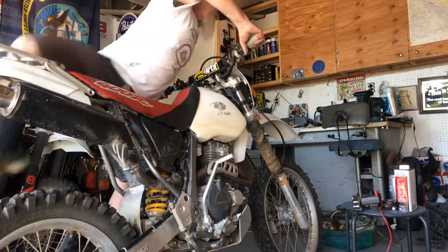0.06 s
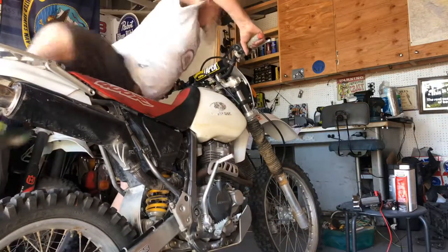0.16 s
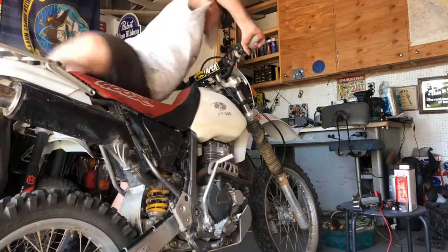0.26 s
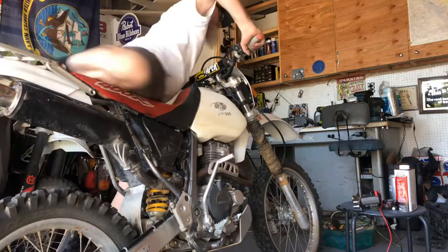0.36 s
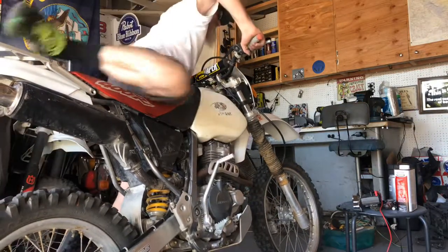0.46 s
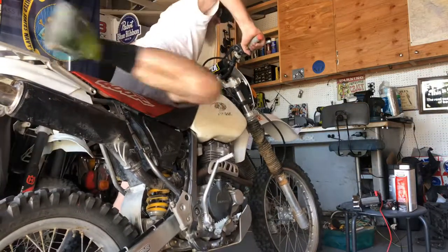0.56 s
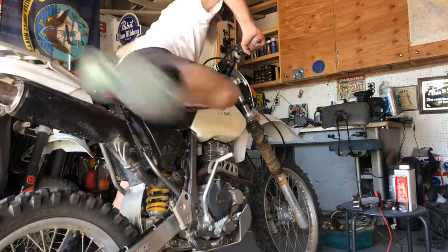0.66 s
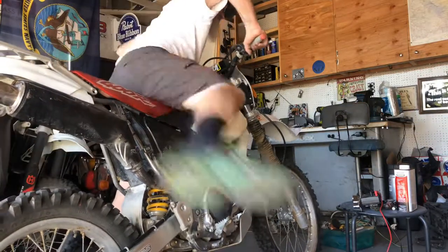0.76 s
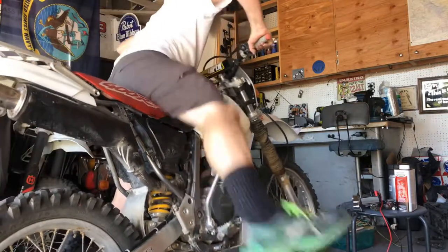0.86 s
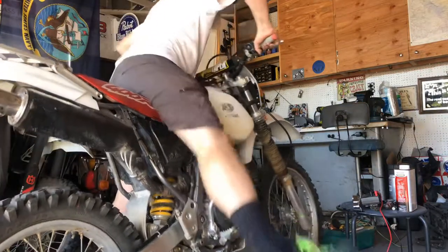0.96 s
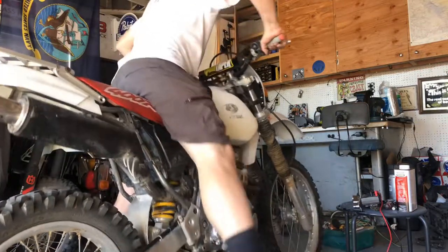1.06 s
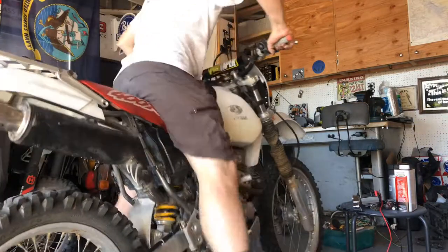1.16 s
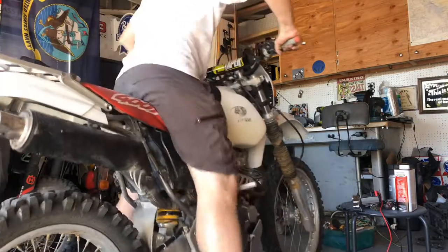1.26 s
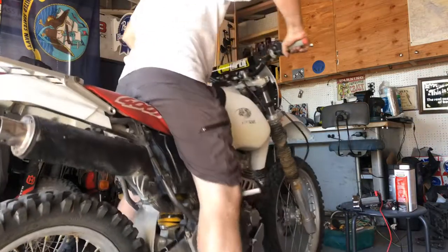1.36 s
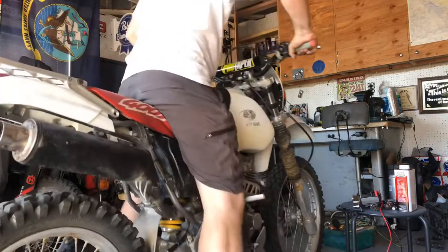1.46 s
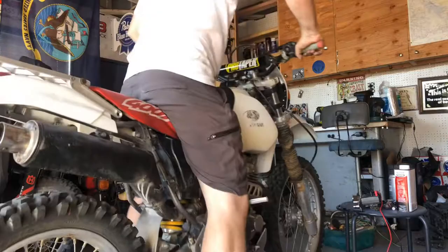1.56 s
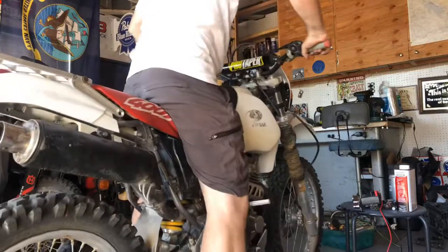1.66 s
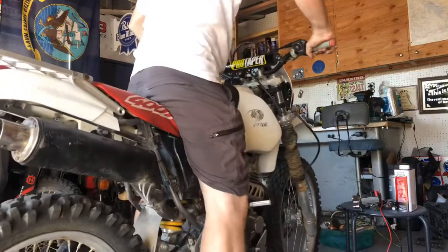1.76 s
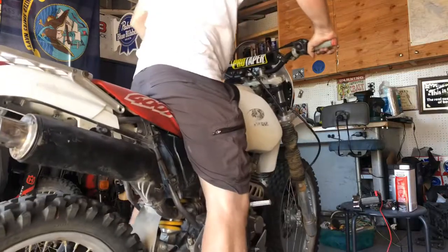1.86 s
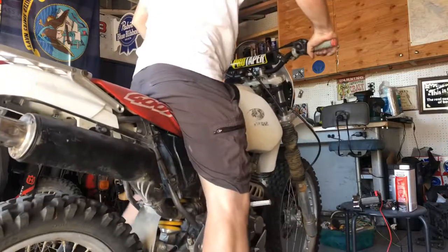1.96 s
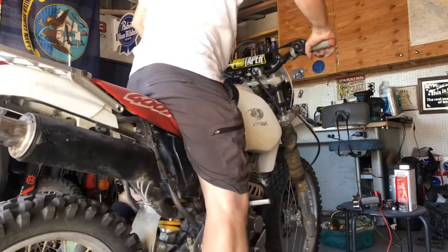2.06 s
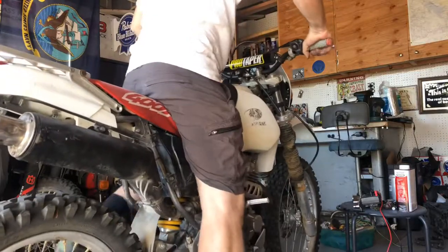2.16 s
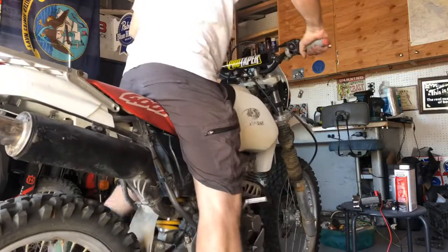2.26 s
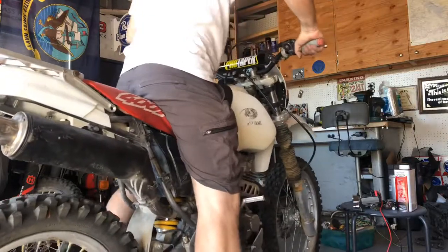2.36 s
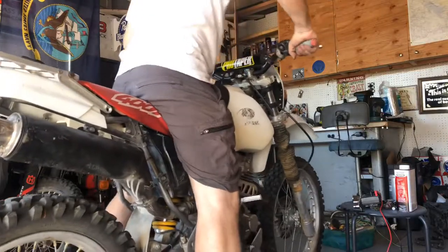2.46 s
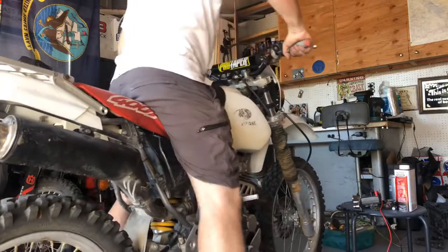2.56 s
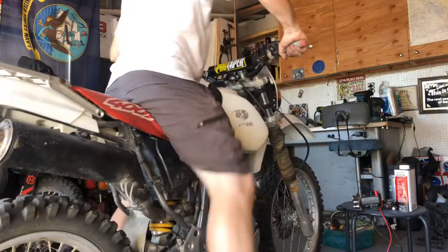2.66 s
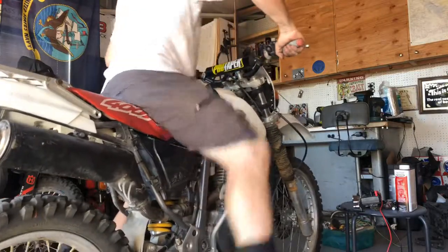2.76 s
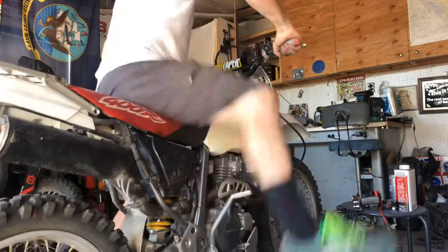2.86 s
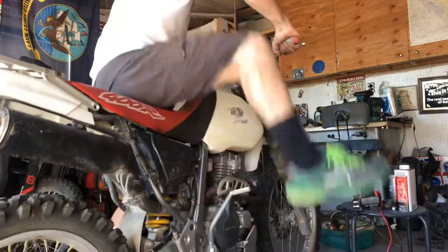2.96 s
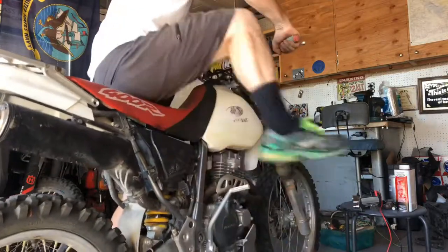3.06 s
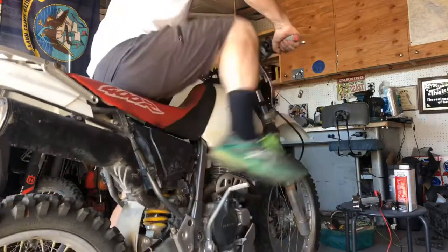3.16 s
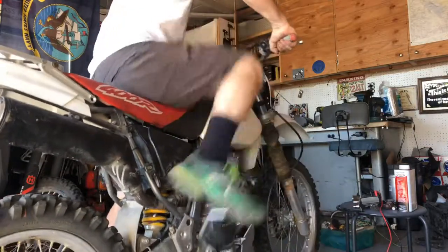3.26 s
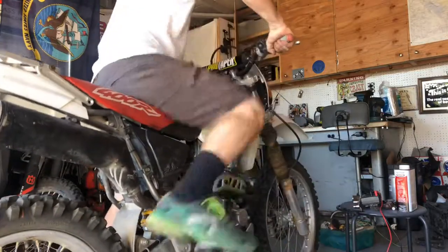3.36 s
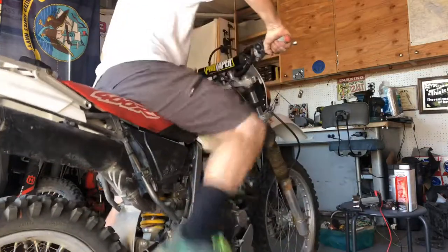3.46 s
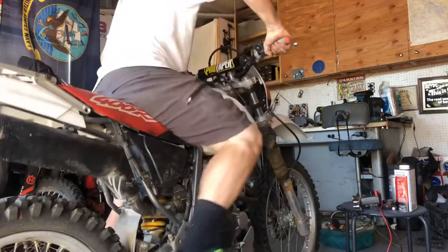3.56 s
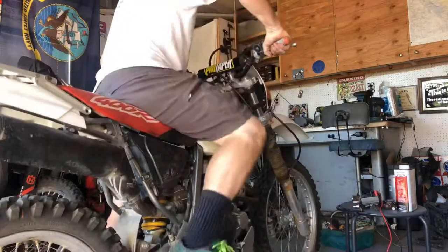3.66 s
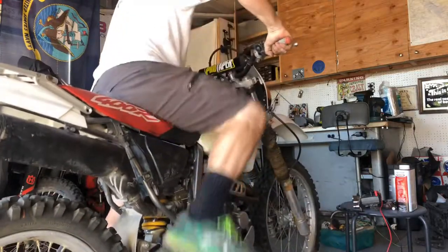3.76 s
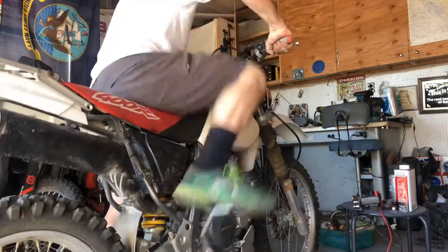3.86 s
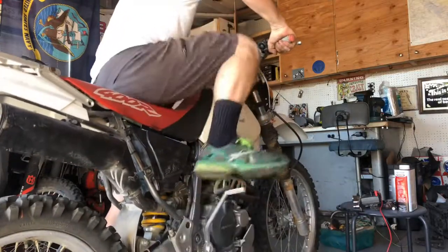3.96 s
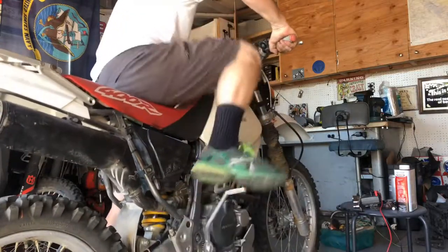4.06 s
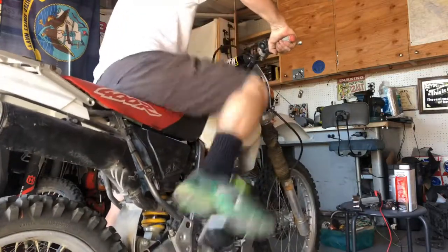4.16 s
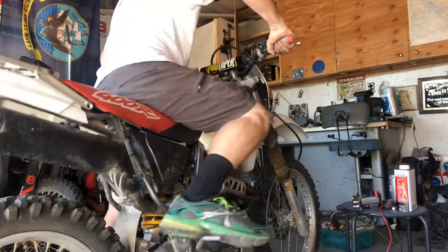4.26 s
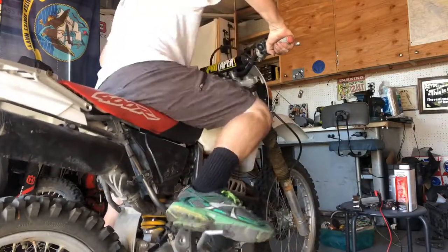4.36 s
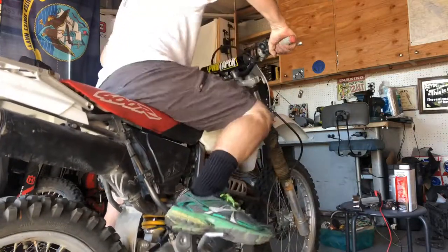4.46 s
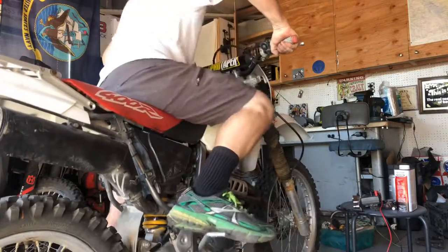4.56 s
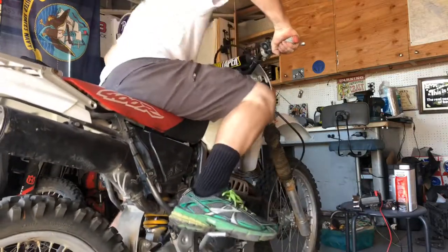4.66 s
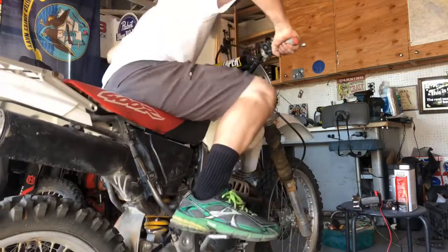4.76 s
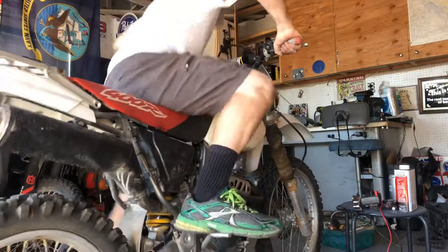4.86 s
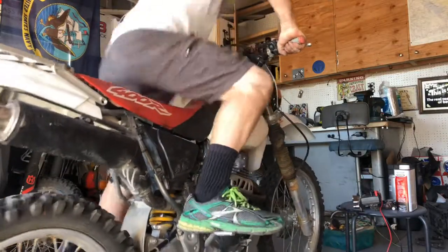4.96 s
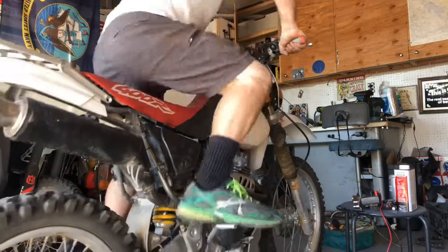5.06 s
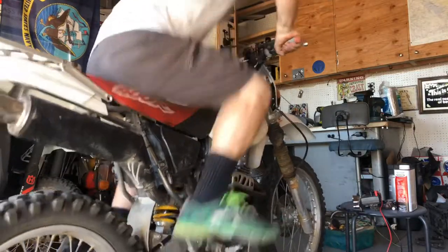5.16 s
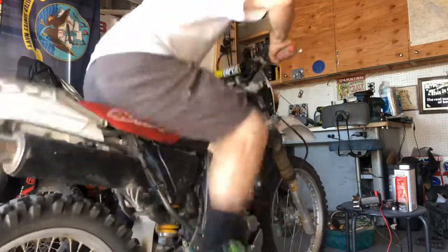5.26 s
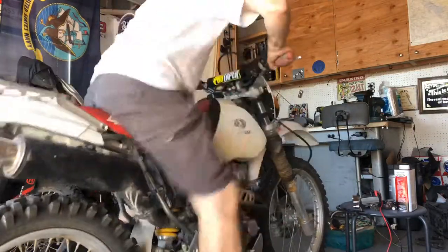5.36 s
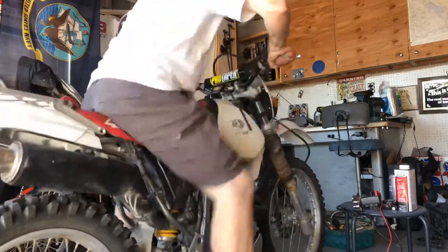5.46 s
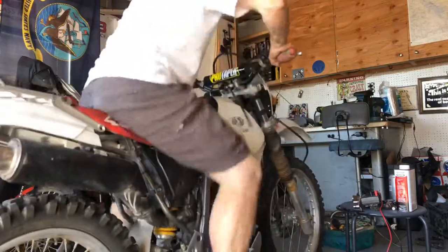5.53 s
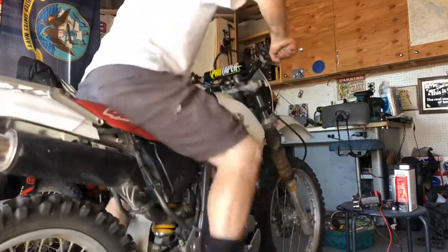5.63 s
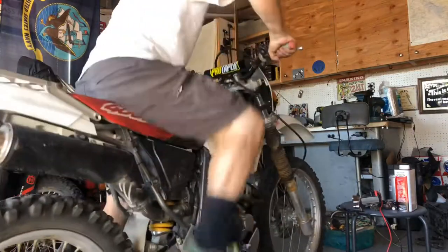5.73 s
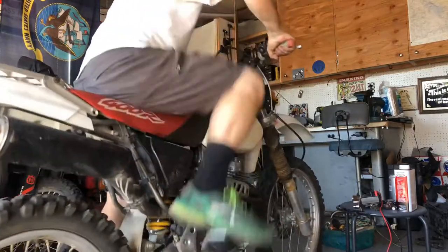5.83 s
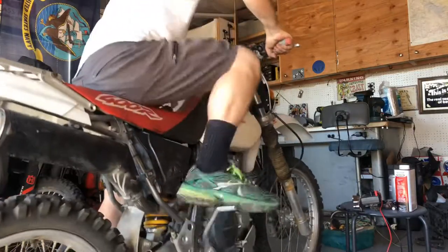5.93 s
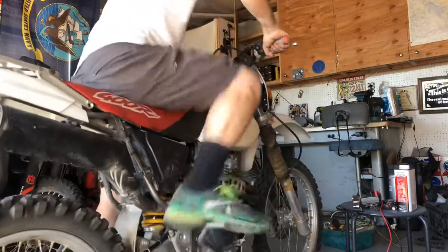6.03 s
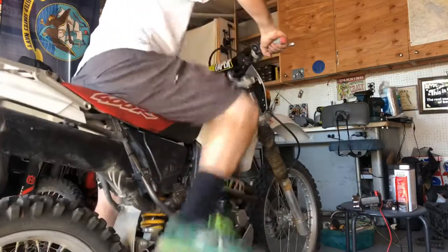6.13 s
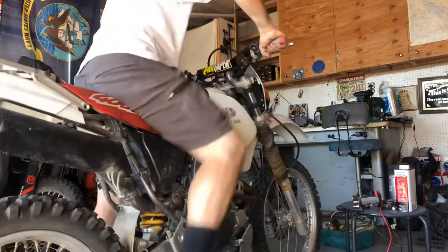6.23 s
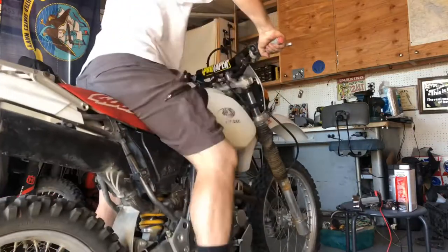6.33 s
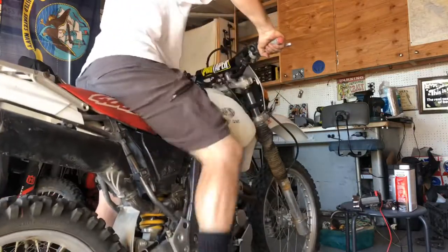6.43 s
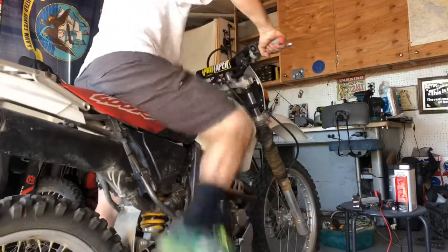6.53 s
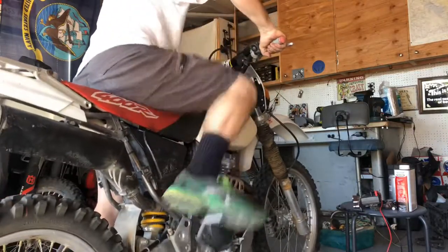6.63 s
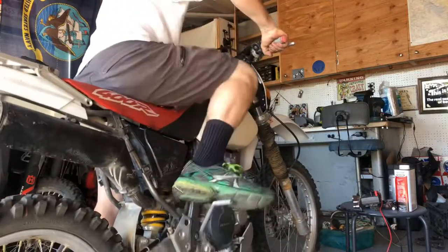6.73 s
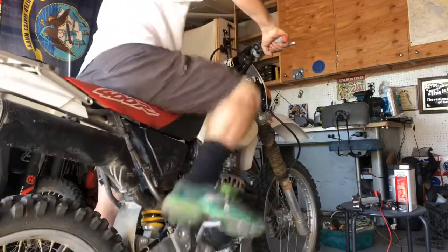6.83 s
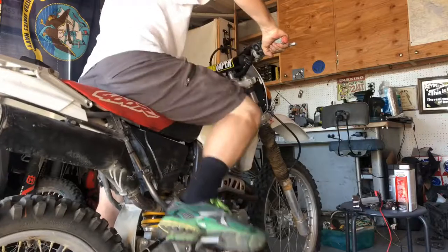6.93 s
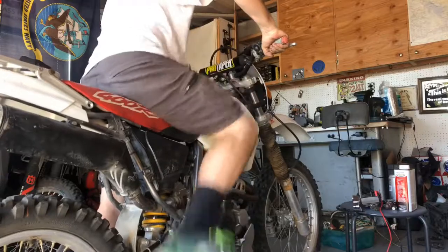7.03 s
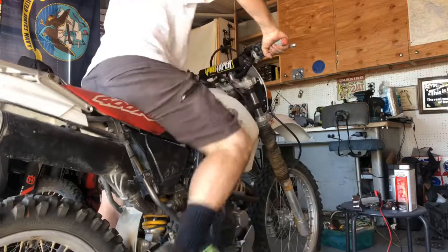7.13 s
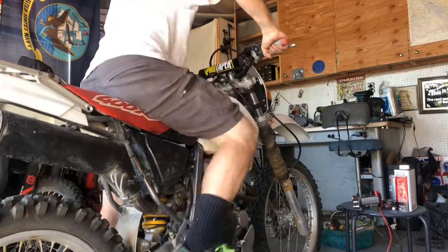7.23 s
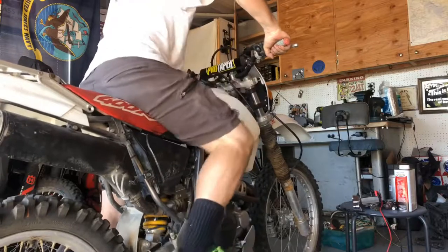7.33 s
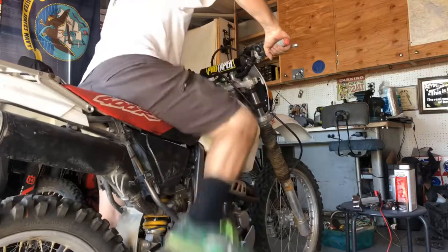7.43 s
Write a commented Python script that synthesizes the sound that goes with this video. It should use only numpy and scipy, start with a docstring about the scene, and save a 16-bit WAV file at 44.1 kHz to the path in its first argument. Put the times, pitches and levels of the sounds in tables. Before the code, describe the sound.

One microphone sits close to a dirt bike in a quiet garage, with a short echo from hard walls. Faint scuffs come at about 0.6 seconds, then light steel clicks from 1 to 1.3. At 2.1 the kick lever swings out with a loud clank, its spring ringing faintly afterwards. From 3.3 to 4.3 it is eased round with small knocks, clicks, a soft churn of gears and shoe scuffs. At 5.2 comes the one hard kick, the loudest moment: gears churn, the cylinder gives a quick cluster of deep thumps through the silencer, and the lever strikes its stop near 5.5. It ratchets back from 5.7 to 5.9. A gentler push at 6.1 turns the gears with a low puff from the pipe, followed by more ratcheting at 6.5, a knock at 6.9 and a last short push with scuffs. The engine never catches.

```python
"""Dirt bike kicked over in a garage

One microphone close to a single-cylinder dirt bike in a quiet home garage; the engine does not catch.
The kick lever swings out with a clank, is eased round to compression and stamped down once: the
cylinder thumps through the silencer, the lever hits its stop and ratchets back. Gears churn and a
shoe scuffs in between, and the hard walls answer."""
import sys
import numpy as np
from scipy import signal
from scipy.fft import rfft, irfft, next_fast_len
from scipy.io import wavfile
from scipy.ndimage import map_coordinates

SR = 44100
rng = np.random.default_rng(int(sys.argv[2]) if len(sys.argv) > 2 else 0)


def transcribe(signal):
    """Save signal, clipped to [-1, 1], as a 16-bit WAV file at the path in sys.argv[1]."""
    frames = np.atleast_2d(signal).T
    limited = np.clip(frames, -1, 1)
    pcm = np.round(limited * 32767).astype(np.int16)
    wavfile.write(sys.argv[1], SR, pcm)


N = 330309
RING_TIME = np.arange(SR * 3 // 4) / SR  # seconds since a blow

# Levels in the tables are relative; a t60 is the time to fall by 60 dB.
# The garage's reverberation. Each row: frequency in Hz, t60 in seconds.
GARAGE_DECAY = [(80, 0.24), (500, 0.44), (1200, 0.4), (4000, 0.33), (8000, 0.26), (15000, 0.18)]
# Tone colours at the microphone. Each row: frequency in Hz, level in dB.
ROOM_TONE = [(15, -26), (25, -6), (72, -1.5), (354, -6.5), (427, -4), (1370, -17.5), (2760, -17.5),
             (7920, -25.5), (16000, -39)]
AIR_TONE = [(20, -12.5), (45, -4.5), (60, -8), (69, 6), (82, -10), (120, -7), (170, -26), (400, -47.5)]
GEAR_TONE = [(65, -35), (110, 6), (184, -4.5), (315, 0.5), (532, -3), (646, 0), (1260, -12), (2010, -24.5),
             (3000, -41), (3900, -37), (6600, -120)]
RUB_TONE = [(710, -28), (1200, -3), (2480, 5), (3180, -1.5), (4220, -3), (4960, -7.5), (12500, -28),
            (16000, -27)]
STEEL_TONE = [(30, 7), (90, -13), (250, 3), (1000, -2), (2400, -4.5), (3500, -4.5), (5800, 2.5), (7500, 4),
              (11000, 5), (15500, -2)]
CASE_TONE = [(30, -47), (65, -5), (110, 4.5), (215, 4.5), (310, 2.5), (500, -1.5), (730, 0.5), (1100, -6),
             (1500, -4.5), (2600, -2.5), (5800, -0.5), (10000, -7.5), (15500, -18)]
# Bass, middle, treble and top of a contact. Each row: lower edge in Hz, upper edge in Hz.
CONTACT_BANDS = [(100, 500), (500, 2500), (2500, 7000), (7000, 16000)]
# The bike's ringing parts. Each row: frequency in Hz, level in dB, t60 in seconds.
SPRING_MODES = [(670, -33, 1.1), (659, -3.5, 3.1), (936, -3.5, 1.2), (1084, -5.5, 1.8), (1227, -11, 1.1),
                (1680, -12, 1.3), (3310, -26.5, 3.5)]
STEEL_MODES = [(1440, -9, 0.84), (1746, 7.5, 0.055), (1980, -8.5, 0.18), (2750, -20, 1), (3450, 0.5, 0.18),
               (3970, -8, 0.56), (4520, 5, 0.068), (4770, -10.5, 0.062), (5870, 0, 0.27), (6400, 2.5, 0.18),
               (6900, -15, 0.17), (8960, -9, 0.11)]
CASE_MODES = [(276, -1, 0.24), (373, 1.5, 0.22), (418.2, -1.5, 0.41), (492.4, -8, 0.64),
              (630.4, -3.5, 0.55), (722, 2, 0.12), (767, -22, 0.2), (919.5, 3, 0.46), (1073, 0, 0.36),
              (1130, -13, 0.51), (1200, -1, 0.16), (1500, 1, 0.23), (1650, -6, 0.25), (1685, -1, 0.35)]
SILENCER_MODES = [(66, -6.5, 0.22), (93.5, 5.5, 0.066), (125.2, 3.5, 0.21), (270, 5.5, 0.14)]
# The low murmur between strokes. Each row: time in seconds, level in dB.
MURMUR_LEVELS = [(0.0, -69), (1.92, -62), (2.17, -57), (2.75, -57.5), (4.97, -57.5), (5.1, -56.5)]
# Pushes that turn the crank. Each row: start and length in seconds, then gears, air and rubbing in dB.
CRANK_STROKES = [(3.313, .24, -49.5, -49.5, -55.5), (4.162, 0.16, -57, -62, -56.5),
                 (5.249, 0.2, -40, -46, -51), (6.099, 0.34, -45.5, -51.5, -54),
                 (7.072, 0.12, -47, -49, -54.5)]
# Shoe and clothes on lever, peg and seat. Each row: time in seconds, level in dB, brightness in dB.
SHOE_SCUFFS = [(0.577, -52, -23), (0.6632, -50.5, -35), (1.6673, -53, -25), (1.919, -48, -19),
               (4.1946, -39, -23.5), (4.2337, -36, -26), (4.9456, -42, -11.5), (5.158, -48, -19.5),
               (5.2184, -34.5, -14.5), (5.4024, -36.5, -4), (6.2773, -43.5, -14), (6.348, -34, -15),
               (6.8703, -39.5, -27), (7.101, -45, -30), (7.206, -51.5, -5), (7.2829, -43.5, -19),
               (7.446, -40, -12)]
# Blows that set the spring singing. Each row: start in seconds, level in dB.
SPRING_TWANGS = [(1.996, -46), (2.145, -53.5)]
# Single contacts of pivot, pawl and stop.
# Each row: time in seconds, level in dB, brightness in dB, ping in Hz.
LEVER_CLICKS = [(1.012, -35, -18.5, 4710), (1.0544, -34.5, -13.5, 4850), (1.3289, -36.5, -28, 4650),
                (1.9936, -41, -11, 2780), (2.0976, -32.5, -13.5, 6970), (3.419, -34, -7, 5850),
                (3.475, -43, -7, 5700), (5.2939, -22, -25, 3900), (5.4544, -17, -13.5, 5800)]
# The lever springing back. Each row: start in seconds, tooth count (to be rounded), first gap and its
# growth per tooth in seconds, tooth level, last tooth level and brightness in dB, ping in Hz.
LEVER_RETURNS = [(3.8734, 2, 0.046, 0, -27.5, -25, -13.5, 4960),
                 (5.691, 5.53, 0.05, 0.00071, -30.5, -24.5, -10.5, 3147),
                 (6.5448, 4.6, .037, .004, -28, -27.5, -14, 4170)]
# Lever and shoe on the engine case. Each row: time in seconds, level, bass weight and treble hardness
# in dB, ping in Hz, gap to the second contact in seconds, its level in dB.
CASE_KNOCKS = [(1.836, -36, -5.5, -6, 928, .02, -48), (2.144, -12.5, -13.5, -11.5, 918, 0.018, -13.5),
               (3.278, -33, -14, -1, 1743, 0.025, -24), (3.351, -27, -9, -8.5, 909, 0.053, -44),
               (3.725, -37.5, -18, -3, 1040, .012, -40), (3.982, -32, -8, -3, 703, 0.03, -47),
               (4.169, -38, -7, -14, 465, 0.025, -35), (4.265, -30.5, -11, -7, 918, 0.022, -34.5),
               (5.225, -29, -7.5, -29, 612, .019, -24.5), (5.481, -19, -11.5, -6.5, 659, .05, -32),
               (6.083, -33.5, -10.5, -3.5, 657, 0.026, -43), (6.907, -31, -11, -7.5, 665, 0.022, -35.5)]
# The kicked cylinder's gas pulses. Each row: time in seconds, level in dB, width in seconds.
GAS_PULSES = [(5.384, -8, 0.0018), (5.488, -21, 0.00123), (5.546, -9, 0.00288), (5.598, -27, 0.0025)]


def amp(db):
    """Decibels to gain."""
    return 10 ** (np.asarray(db) / 20)


def unit(x):
    """Scale to rms 1."""
    return x / np.sqrt(np.mean(x ** 2) + 1e-20)


def along(points, hz):
    """Read (Hz, value) points on a log axis."""
    knots, values = np.transpose(points)
    return np.interp(np.log(hz + 1), np.log(knots + 1), values)


def wobble(rate):
    """A smooth random curve, rate knots a second."""
    return map_coordinates(rng.standard_normal(int(N * rate / SR) + 4), [np.arange(N) * rate / SR])


def add(track, start, sound):
    """Mix a sound into the track from start, in seconds."""
    part = track[round(start * SR):][:len(sound)]
    part += sound[:len(part)]


def coloured(x, *curves):
    """Minimum-phase filter whose gain is the sum of (Hz, dB) curves."""
    size = 2 * next_fast_len(len(x) // 2 + 2048)
    hz = np.fft.rfftfreq(size, 1 / SR)
    gain = amp(sum(along(curve, hz) for curve in curves))
    cepstrum = irfft(np.log(gain + 1e-6), size)
    cepstrum[1:size // 2] *= 2
    cepstrum[size // 2 + 1:] = 0
    return irfft(rfft(x, size) * np.exp(rfft(cepstrum)), size)[:len(x)]


def shaped(x, tone):
    """x coloured by a tone, at rms 1."""
    return unit(coloured(x, tone))


def ring(modes, scatter_db):
    """Damped modes, their strengths scattered at random."""
    hz, db, t60 = np.transpose(modes)[:, :, None]
    level = db + scatter_db * rng.standard_normal(hz.shape)
    return np.sum(amp(level - 60 * RING_TIME / t60) * np.sin(2 * np.pi * hz * RING_TIME), axis=0)


def room_tone():
    """The garage's faint, steady background."""
    return amp(-65) * shaped(rng.standard_normal(N), ROOM_TONE)


def garage(build_s):
    """The walls' answer to a click: it builds up, and the treble dies first."""
    hz, t, spectra = signal.stft(rng.standard_normal(len(RING_TIME)), SR, nperseg=256)
    decay = amp(-60 * t / along(GARAGE_DECAY, hz)[:, None])
    _, tail = signal.istft(spectra * decay, SR, nperseg=256)
    return tail[:len(RING_TIME)] * (1 - np.exp(-RING_TIME / build_s))


def stroke_gain(part, murmur_db, fall_db_per_s, lag_s=0, take_up_s=0.013, swell_db=4.5):
    """A part's gain over the murmur: at each push slack is taken up, the crank speeds up, then slows."""
    t = np.arange(N) / SR
    gain = amp(np.interp(t, *np.transpose(MURMUR_LEVELS)) + murmur_db)
    for start, length, *levels in CRANK_STROKES:
        db = levels[("gears", "air", "rubbing").index(part)]
        age = np.maximum(t - start - lag_s, 0)
        take_up = 1 - np.exp(-age / take_up_s)
        swell = swell_db * np.minimum(age / length - 1, 0)
        fall = fall_db_per_s * np.maximum(age - length, 0)
        gain = np.hypot(gain, take_up * amp(db + swell - fall))
    return gain


def pipe_air():
    """Air sighs through the pipe just after the crank begins to move."""
    gain = stroke_gain("air", murmur_db=-8.5, fall_db_per_s=92, lag_s=0.062)
    return gain * shaped(rng.standard_normal(N), AIR_TONE)


def gears():
    """Meshing teeth churn and ring the case, then coast to rest."""
    gain = stroke_gain("gears", murmur_db=-0.5, fall_db_per_s=98)
    mesh = unit(rng.standard_normal(N) * amp(2 * wobble(70)))
    case_ring = unit(signal.fftconvolve(mesh, ring(CASE_MODES, scatter_db=2.5))[:N])
    return gain * shaped(mesh + amp(-19) * case_ring, GEAR_TONE)


def shoe_rub():
    """The sole slides on the lever in many fine slips."""
    gain = stroke_gain("rubbing", murmur_db=-23.5, fall_db_per_s=109)
    slips = rng.standard_normal(N) * amp(1.5 * wobble(110) + 3.5 * wobble(22))
    return gain * shaped(slips, RUB_TONE)


def frame(t60, count):
    """Tubes, brackets and spokes: a new handful of their many modes answers each blow."""
    size = len(RING_TIME)
    hz = 900 * 12 ** rng.random(count)
    lines = np.zeros(size // 2 + 1, complex)
    lines[np.round(hz * size / SR).astype(int)] = np.exp(2j * np.pi * rng.random(count))
    return unit(irfft(lines, size)) * amp(-60 * RING_TIME / t60)


def blow(band_db, tone, modes, ping_hz, ping_db, ping_t60, crack_t60, rise_s, ring_db, frame_db, room_db):
    """One contact: a short crack, the struck part's modes, the frame's jangle and the room's tail."""
    crack = rng.standard_normal(len(RING_TIME)) * amp(-60 * RING_TIME / crack_t60)
    ping = ring([(ping_hz, ping_db, ping_t60)], scatter_db=6.5)  # the contact point favours one mode
    jangle = amp(frame_db) * frame(t60=0.22, count=36)
    body = amp(ring_db) * ring(modes, scatter_db=2.5)
    walls = amp(room_db) * garage(build_s=0.011)
    onset = 1 - np.exp(-(RING_TIME / rise_s) ** 2)
    low, high = np.transpose(CONTACT_BANDS)
    density = np.column_stack([np.sqrt(low * high), band_db - 10 * np.log10(2 * (high - low) / SR)])
    # broad, quickly damped resonances differ from blow to blow
    knots = np.geomspace(900, 16000, 110)
    ripple_db = 2.3 * rng.standard_normal(len(knots)) * (knots > knots[0])
    ripple = np.column_stack([knots, ripple_db])
    return coloured(onset * (crack + ping + jangle + body + walls), density, tone, ripple)


def loaded(modes):
    """The load on the lever shifts each mode a little from one contact to the next."""
    return [(hz * (1 + 0.012 * rng.standard_normal()), db, t60) for hz, db, t60 in modes]


def scuffs():
    """Rubber and cloth glance over steel: a soft start and little bass."""
    out = np.zeros(N)
    for at, db, bright in SHOE_SCUFFS:
        bands = db + np.array([-18.5, -4, 0, bright])
        sound = blow(bands, STEEL_TONE, loaded(STEEL_MODES), ping_hz=4200, ping_db=-30, ping_t60=0.18,
                     crack_t60=0.051, rise_s=0.0084, ring_db=-18.5, frame_db=-11, room_db=-3)
        add(out, at - 0.007, sound)
    return amp(-1.5) * out


def spring():
    """The lever and its return spring sing on after a blow."""
    out = np.zeros(N)
    song = ring(SPRING_MODES, scatter_db=0)
    for start, db in SPRING_TWANGS:
        add(out, start, amp(db) * song)
    return out


def teeth(pitch_scatter=0.058):
    """Each return drags teeth past the pawl, evenly or slowing; rows as in LEVER_CLICKS."""
    clicks = []
    for start, count, gap, slowing, db, last_db, bright, hz in LEVER_RETURNS:
        last = round(count) - 1
        for k in range(last + 1):
            at = start + k * gap + slowing * k * (k - 1) / 2
            ping_hz = hz * np.exp(pitch_scatter * rng.standard_normal())
            clicks.append((at, last_db if k == last else db, bright, ping_hz))
    return clicks


def ratchet():
    """Hard steel on steel: teeth slipping past the pawl, the lever's pivot and its stop."""
    out = np.zeros(N)
    for at, db, bright, ping_hz in LEVER_CLICKS + teeth():
        bands = db + np.array([-19.5, -5, 0, bright])
        sound = blow(bands, STEEL_TONE, loaded(STEEL_MODES), ping_hz, ping_db=-19, ping_t60=0.1,
                     crack_t60=0.031, rise_s=0.0029, ring_db=-27, frame_db=-17, room_db=-9)
        add(out, at - 0.002, sound)
    return amp(1.5) * out


def case_knocks():
    """Heavy blows ring the engine case: each touches, then seats with a duller second contact."""
    out = np.zeros(N)
    for start, db, weight, hardness, ping_hz, gap, seat_db in CASE_KNOCKS:
        touch = (start, db, weight, hardness)
        seat = (start + gap, seat_db, weight + 2, hardness - 5)
        for at, level, bass, treble in (touch, seat):
            bands = level + np.array([bass, 0, treble, treble - 3])
            ping_db = -28.5 - 0.97 * bass  # weight behind the blow damps the ping
            sound = blow(bands, CASE_TONE, CASE_MODES, ping_hz, ping_db, ping_t60=0.25,
                         crack_t60=0.062, rise_s=0.0054, ring_db=-27.5, frame_db=-14.5, room_db=-7)
            add(out, at - 0.004, sound)
    return amp(-2) * out


def cylinder(rebound_s=0.01717):
    """Each unfired gulp of gas is a soft pressure pulse that booms in the silencer and the room."""
    t, gas = np.arange(N) / SR, np.zeros(N)
    for at, db, width in GAS_PULSES:
        pulse = np.exp(-((t - at + width) / width) ** 2)
        gas += amp(db) * pulse / (width * SR * np.sqrt(np.pi))
    gas += amp(-5) * np.interp(t - rebound_s, t, gas)  # one echo off the near wall
    boom = amp(-24) * shaped(garage(build_s=0.0067), AIR_TONE)
    silencer = ring(SILENCER_MODES, scatter_db=-2.2)
    return amp(-8) * signal.fftconvolve(gas, silencer + boom)[:N]


def scene():
    """The bike close up over the room tone, in mono."""
    background = room_tone()
    contacts = ratchet() + scuffs() + case_knocks() + spring()
    turning_over = cylinder() + pipe_air() + gears() + shoe_rub()
    return (background + contacts + turning_over)[None]


def record(dry, low_cut_hz=50.4, top_hz=15850):
    """The microphone rolls off the deep bass and keeps nothing above its band limit."""
    size = next_fast_len(N + SR // 2)
    hz = np.fft.rfftfreq(size, 1 / SR)
    low_cut = 1 / np.sqrt(1 + (low_cut_hz / (hz + 1)) ** 12)
    return irfft(rfft(dry, size) * low_cut * (hz < top_hz), size)[:, :N]


dry = scene()
out = record(dry)
transcribe(out)
```